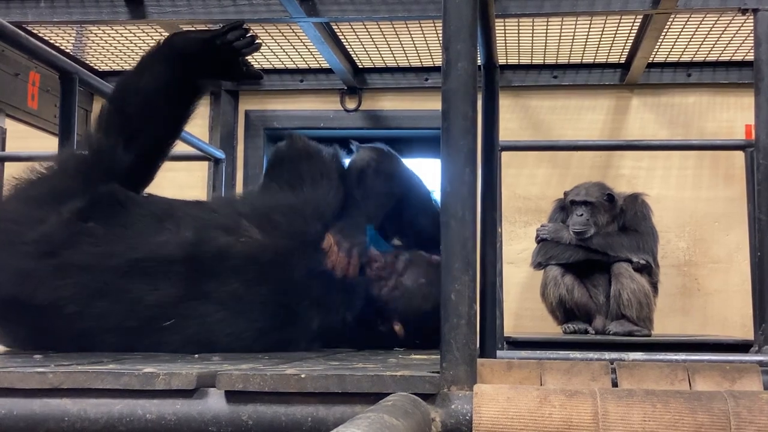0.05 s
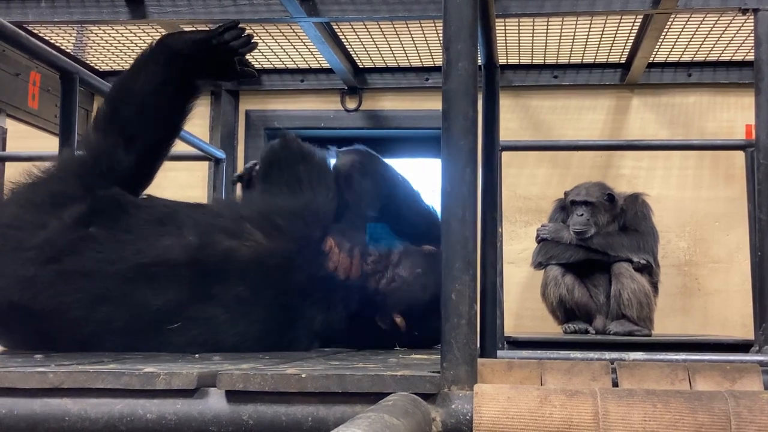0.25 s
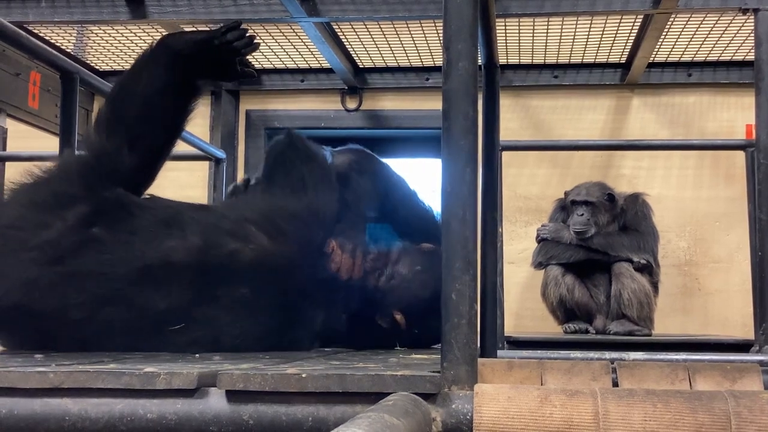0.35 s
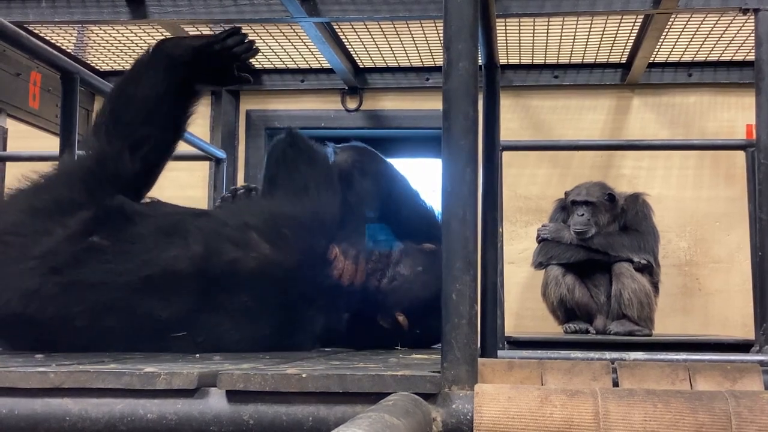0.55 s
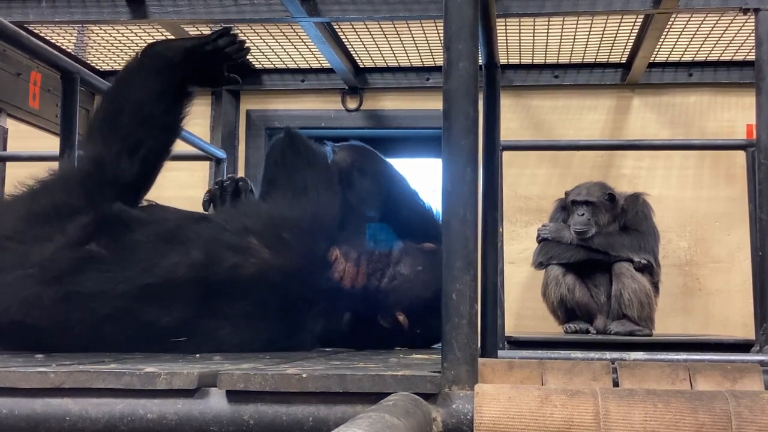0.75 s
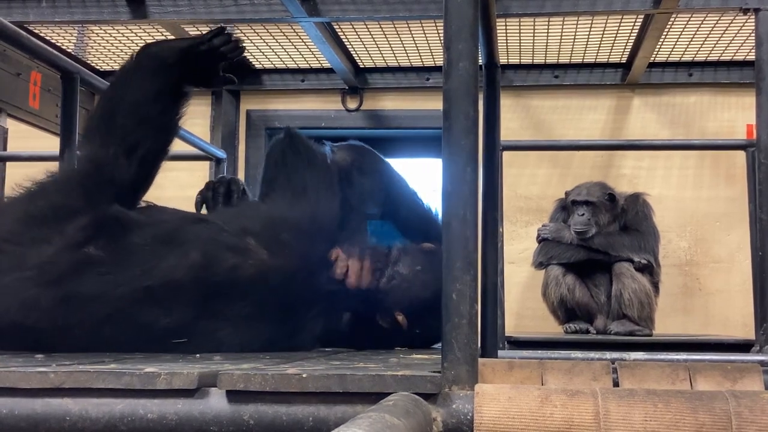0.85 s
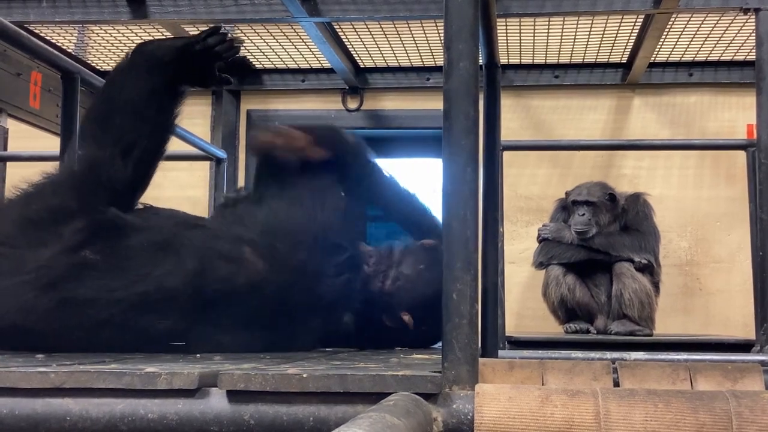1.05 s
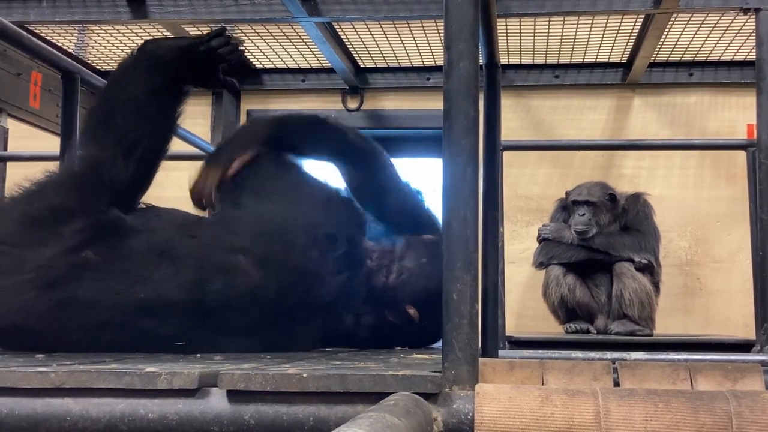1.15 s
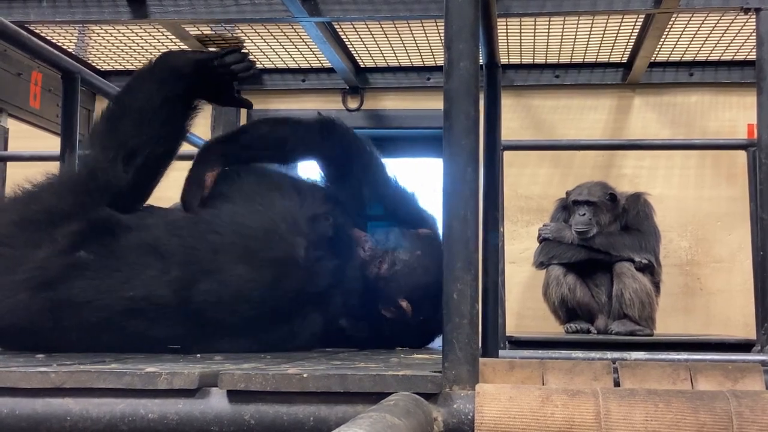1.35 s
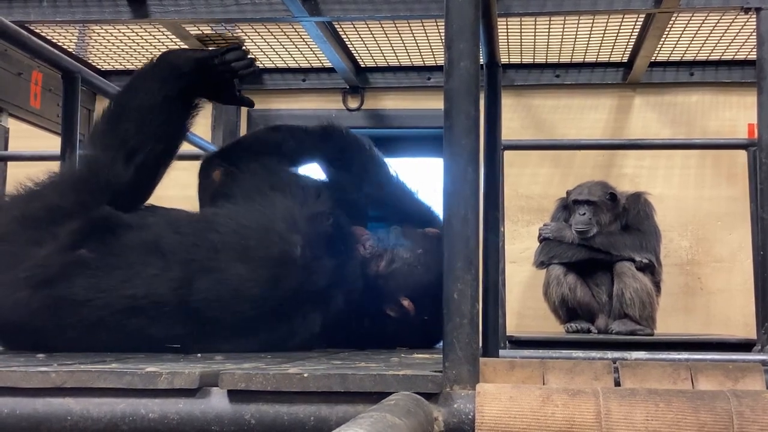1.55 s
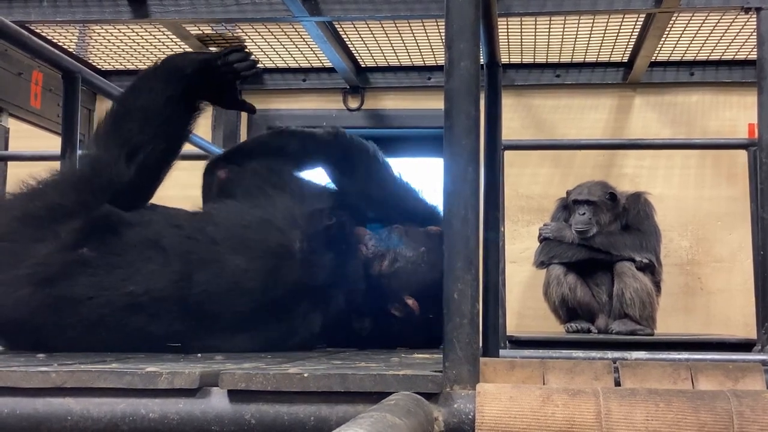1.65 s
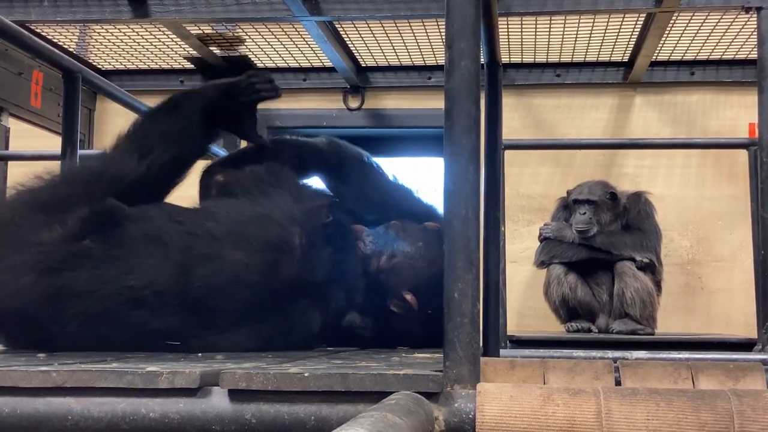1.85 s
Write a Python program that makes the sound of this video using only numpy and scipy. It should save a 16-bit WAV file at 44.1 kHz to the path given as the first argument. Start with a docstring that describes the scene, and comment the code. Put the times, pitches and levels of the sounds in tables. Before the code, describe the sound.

A single metallic bang cracks out almost at once over steady ventilation hum in an indoor animal enclosure. Its echo fades in the hard-walled room, and faint, distant clinks come from the cage as the air keeps rushing.

```python
"""Ventilation rumbles and hums in a bare-walled indoor ape enclosure, and keeps on throughout.
A moment in comes one sharp, bright bang, like hard metal struck: a few quick contacts crack,
the metal rings briefly and the walls echo. Faint, high clinks follow from further off in the cage.
A small stereo recorder with closely spaced microphones ducks the room after the bang, then recovers."""
import sys
import numpy as np
from scipy import signal
from scipy.fft import rfft, irfft
from scipy.io import wavfile
from scipy.ndimage import uniform_filter1d, minimum_filter1d

SR = 44100
rng = np.random.default_rng(int(sys.argv[2]) if len(sys.argv) > 2 else 0)


def file_out(sig):
    """Save sig as 16-bit WAV at sys.argv[1]."""
    # one column per channel
    cols = np.atleast_2d(sig).T
    # limit, then scale
    lim = np.clip(cols, -1, 1)
    pcm = np.round(lim * 32767).astype(np.int16)
    wavfile.write(sys.argv[1], SR, pcm)


N = 83790


def amp(db):
    """Decibels to gain."""
    return 10 ** (np.asarray(db) / 20)


def unit(x):
    """Scales to rms 1."""
    return x / np.sqrt(np.mean(x ** 2) + 1e-20)


def read(points, hz):
    """Reads a table on a log-frequency axis."""
    f, value = np.transpose(points)
    return np.interp(np.log(hz + 1), np.log(f + 1), value)


def add(mix, start_s, sound):
    """Mixes a sound in at its start time."""
    part = mix[:, round(start_s * SR):][:, :sound.shape[1]]
    part += sound[:, :part.shape[1]]


def colour(x, shape, size=2048):
    """Minimum-phase filter of unit power whose gain follows a (Hz, dB) table."""
    hz = abs(np.fft.fftfreq(size, 1 / SR))
    log_gain = np.log(unit(amp(read(shape, hz))) + 1e-5)
    taps = np.fft.ifft(np.exp(np.conj(signal.hilbert(log_gain)))).real
    return signal.oaconvolve(x, taps[None], axes=1)[:, :x.shape[1]]


def air_noise(shape, drift_db=1.2, size=2048):
    """Two channels of coloured noise whose level drifts in patches of time and frequency."""
    hz = np.fft.rfftfreq(size, 1 / SR)
    re_a, im_a, re_b, im_b, drift = rng.standard_normal((N * 4 // size + 5, len(hz), 5)).T
    drift = uniform_filter1d(drift, size=14, axis=0)
    drift = unit(uniform_filter1d(drift, size=8, axis=1))
    white = np.array([re_a + 1j * im_a, re_b + 1j * im_b])
    spectra = white * amp(read(shape, hz)[:, None] + drift_db * drift)
    return unit(signal.istft(spectra, nperseg=size, noverlap=size - size // 4)[1][:, :N])


# Air rushing through the enclosure. Each row: frequency in Hz, relative noise density in dB.
AIR_COLOUR = [(30, -48), (70, -35), (120, -4), (180, -4), (270, -2), (500, -7.5), (950, -10), (1400, -17),
              (2500, -23), (4500, -32.5), (7500, -38), (10000, -37), (12500, -45.5), (14500, -65),
              (16000, -66)]
# The rumble beneath it. Each row: frequency in Hz, relative noise density in dB.
RUMBLE_COLOUR = [(20, -37), (30, -11), (42, -4), (52, -27), (66, 1.5), (85, -0.5), (120, -2.5), (190, -6),
                 (290, -3.5), (450, -30), (2000, -50)]
# Rise and fall of the rumble. Each row: time in seconds, relative level in dB.
RUMBLE_SWELL = [(0, -43), (.14, -44), (.25, -49), (.44, -50), (.53, -39.5), (.67, -41.5), (.78, -39),
                (.88, -40), (.97, -43), (1.04, -42), (1.14, -44), (1.28, -45), (1.39, -41), (1.54, -42),
                (1.66, -49), (1.8, -46), (1.9, -43)]
# Fan hum. Each row: frequency in Hz, level in dB against the rumble.
FAN_HUM = [(66, -7), (110.5, -8)]

def ventilation(air_db=-41, rumble_db=-1.5, waver_hz=1.74):
    """Room tone: steady air, with a rumble and two wavering fan tones that swell together."""
    t = np.arange(N) / SR
    swell = amp(rumble_db + np.interp(t, *np.transpose(RUMBLE_SWELL)))
    out = amp(air_db) * air_noise(AIR_COLOUR) + swell * air_noise(RUMBLE_COLOUR, size=4096)
    for hz, db in FAN_HUM:
        waver = unit(uniform_filter1d(rng.standard_normal((2, N)), size=5000, axis=1))
        cycles = np.cumsum(hz + waver_hz * waver, axis=1) / SR
        out += swell * amp(db) * np.sqrt(2) * np.sin(2 * np.pi * cycles)
    return out


def contact(decay_s):
    """A burst of fine chatter as two hard surfaces meet."""
    t = np.arange(SR // 20) / SR
    return rng.choice([-1., 1.], (2, len(t))) * np.exp(-t / decay_s)


# A light touch, the blow, two rebounds. Each row: start in seconds, relative level in dB, decay in seconds.
CONTACTS = [(.2245, -19, .004), (.2270, 0, .0012), (.2286, -3, .001), (.2294, -3.5, .0018)]
# The struck metal's modes. Each row: frequency in Hz, relative level in dB, seconds to fall 60 dB.
METAL_MODES = [(2020, -17, .08), (2450, -22, .06), (3200, -25, .05), (3490, -25, .08), (3850, -28, .12),
               (4250, -27, .05), (4908, -24, .12), (5130, -15, .04), (5829, -28, .12), (7439, -24, .12),
               (10806, -27, .17), (11480, -23, .1), (11800, -27, .12), (12204, -28, .17)]
# The crack coming straight to the microphones. Each row: frequency in Hz, relative gain in dB.
DIRECT_COLOUR = [(200, -39), (700, -18), (1000, -22), (1450, -32), (2000, -9.5), (2900, 0), (3600, -11.5),
                 (4500, -19), (5100, -4), (6000, -13), (7500, -5), (10000, -4), (11700, 4.5), (14000, 4),
                 (16000, -0.5)]
# The bang coming back off the walls. Each row: frequency in Hz, relative gain in dB.
WALL_COLOUR = [(200, -31), (900, -10), (1450, -9), (2100, -6), (2500, -4.5), (3000, -5), (4000, 1.5),
               (5800, 0), (7500, 2), (10500, 5.5), (12500, 2.5), (14000, -1), (16000, -8)]

def bang(level_db=-5, echo_db=5.5, ring_echo_db=-10):
    """A few contacts within milliseconds crack, ring the metal briefly and fill the room."""
    hits, ring, impulse = np.zeros((3, 2, N))
    t = np.arange(SR // 2) / SR
    for start_s, db, decay_s in CONTACTS:
        add(hits, start_s, amp(db) * contact(decay_s))
    blow_s = max(CONTACTS, key=lambda row: row[1])[0]  # the hardest contact
    for hz, db, t60 in METAL_MODES:
        mode = np.sin(2 * np.pi * (hz * t + rng.random((2, 1))))
        add(ring, blow_s, amp(db) * amp(-60 * t / t60) * mode)
    impulse[:, round(blow_s * SR)] = np.linalg.norm(hits[0])  # the energy of all the contacts
    walls = room(amp(echo_db) * colour(impulse, WALL_COLOUR) + amp(ring_echo_db) * ring)
    return amp(level_db) * (colour(hits, DIRECT_COLOUR) + ring + walls)


# Reverberation between the bare walls. Each row: frequency in Hz, seconds to fall 60 dB.
ROOM_DECAY = [(250, 2.1), (2000, 1.98), (4000, 1.39), (7500, 1.06), (11000, 0.72), (13000, 0.38),
              (15500, 0.14)]

def room(x, early_db=0.5, early_t60_s=0.65, build_s=.0045, size=256):
    """The walls return dense early reflections, then a long tail whose treble dies first."""
    hz, t, spectra = signal.stft(rng.standard_normal((2, N)), SR, nperseg=size)
    early = amp(early_db) * amp(-60 * t / early_t60_s)
    late = amp(-60 * t / read(ROOM_DECAY, hz)[:, None])
    tail = signal.istft(spectra * np.hypot(late, early), SR, nperseg=size)[1][:, :N]
    tail *= 1 - np.exp(-np.arange(N) / SR / build_s)
    return signal.fftconvolve(x, tail / np.linalg.norm(tail[0]), axes=1)[:, :N]


def scuff(rise_s):
    """Fine chatter that swells to a peak at rise_s and fades more slowly."""
    age = np.arange(SR // 5) / SR / rise_s
    return rng.standard_normal((2, SR // 5)) * age * np.exp(1 - age)


# Faint clinks and scuffs from the cage.
# Each row: start in seconds, level in dB before the room, centre in Hz, width in octaves, rise in seconds.
CAGE_CLINKS = [(0.601, -39.5, 10800, 0.15, 0.0021), (1.394, -63, 9260, 0.43, 0.036),
               (1.455, -47.5, 6460, 0.55, 0.0046), (1.476, -41.5, 8000, 0.49, 0.0053),
               (1.476, -50, 14500, 0.75, 0.012), (1.481, -49, 2670, 1, 0.0068),
               (1.566, -53, 2080, 0.13, 0.0063), (1.614, -57.5, 12600, 0.45, .02),
               (1.705, -42, 10900, 0.21, 0.0039), (1.806, -58, 10240, 0.14, 0.027)]

def clinks(skirt_db=-24, echo_db=2.5):
    """Small, high contacts further from the microphones, heard mostly through the room."""
    out, hz = np.zeros((2, N)), np.geomspace(500, 20000, 80)
    for start_s, db, centre_hz, octaves, rise_s in CAGE_CLINKS:
        band = np.exp(-.5 * (np.log2(hz / centre_hz) / octaves) ** 2) + amp(skirt_db)
        shape = np.c_[hz, 20 * np.log10(band)]
        add(out, start_s, amp(db) * colour(scuff(rise_s), shape))
    return out + amp(echo_db) * room(out)


def scene():
    """Everything that sounds in the enclosure."""
    return ventilation() + bang() + clinks()


# How alike the two microphones hear the room. Each row: frequency in Hz, correlation from -1 to 1.
MIC_LIKENESS = [(60, 0.99), (130, 0.96), (260, 0.87), (500, 0.72), (1000, -.2), (2000, 0), (4000, 0.02),
                (6000, 0), (7500, 1), (8700, 1), (16000, 0.99)]
# The right microphone leads in the top treble. Each row: frequency in Hz, phase lead in cycles.
RIGHT_LEAD = [(0, 0), (6300, 0), (8000, .23), (9230, .5), (11300, 1), (13720, 1.5), (15700, 2), (22050, 2)]
# The right microphone is mostly a little louder. Each row: frequency in Hz, gain in dB.
RIGHT_GAIN = [(60, 1.1), (250, 0), (500, -.4), (1500, .7), (4000, 1.2), (9000, .1)]

def stereo_pair(x):
    """Closely spaced microphones: bass alike, mids diffuse, top treble alike but shifted in phase."""
    hz = np.fft.rfftfreq(N, 1 / SR)
    left, other = rfft(x)
    likeness = np.clip(read(MIC_LIKENESS, hz), -1, 1)
    right = likeness * left + np.sqrt(1 - likeness ** 2) * other
    right *= np.exp(2j * np.pi * np.interp(hz, *np.transpose(RIGHT_LEAD)))
    right *= amp(read(RIGHT_GAIN, hz))
    return irfft(np.array([left, right]), N)


def gain_control(x, threshold_db=-17.5, cut_per_db=0.27, hold_s=0.205, recover_db_per_s=36):
    """The recorder turns down on a loud peak, holds, then comes steadily back up."""
    power = abs(uniform_filter1d((x ** 2).mean(0), size=300))
    cut_db = cut_per_db * np.maximum(10 * np.log10(power + 1e-12) - threshold_db, 0)
    hold = int(hold_s * SR) // 2 * 2 + 1
    held_db = -minimum_filter1d(-cut_db, hold, origin=hold // 2)
    recovery_db = recover_db_per_s * np.arange(N) / SR
    duck_db = np.maximum.accumulate(held_db + recovery_db) - recovery_db
    return x * amp(-duck_db)


def record(dry, cutoff_hz=15900):
    """The small recorder: stereo pair, gain control, then the band limit."""
    ducked = gain_control(stereo_pair(dry))
    low_pass = signal.firwin(511, cutoff_hz, window=("kaiser", 9), fs=SR)
    return signal.oaconvolve(ducked, low_pass[None], "same", axes=1)


dry = scene()
out = record(dry)
file_out(out)
```